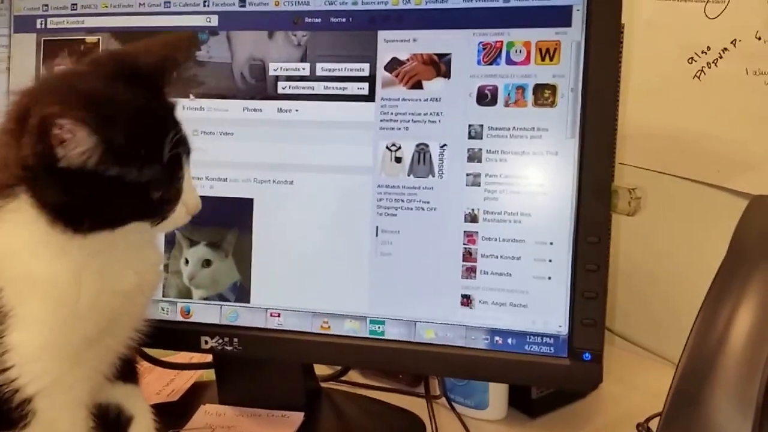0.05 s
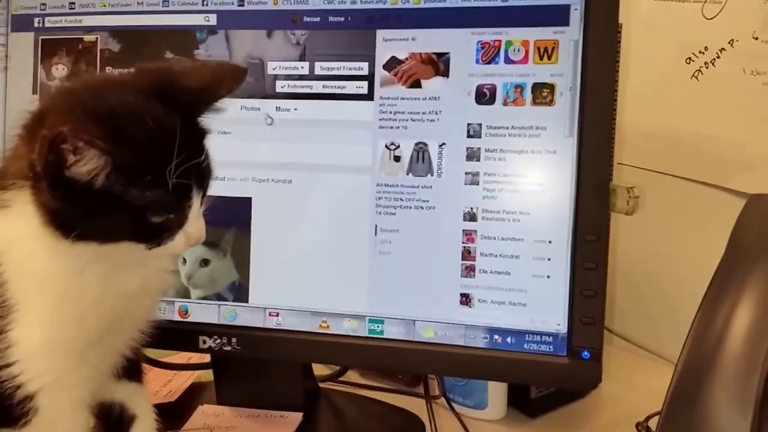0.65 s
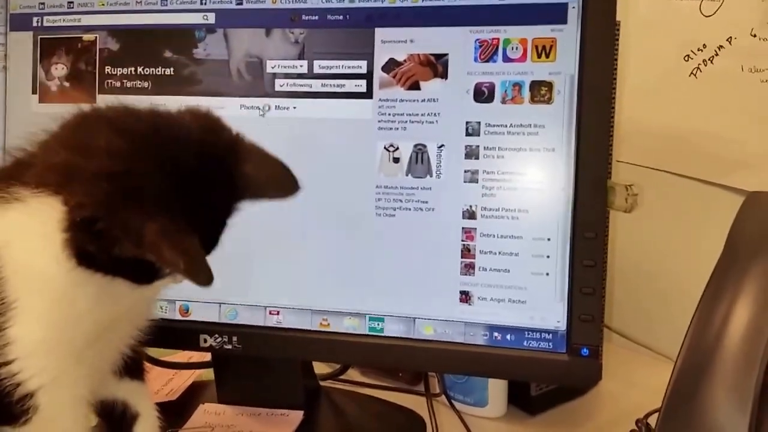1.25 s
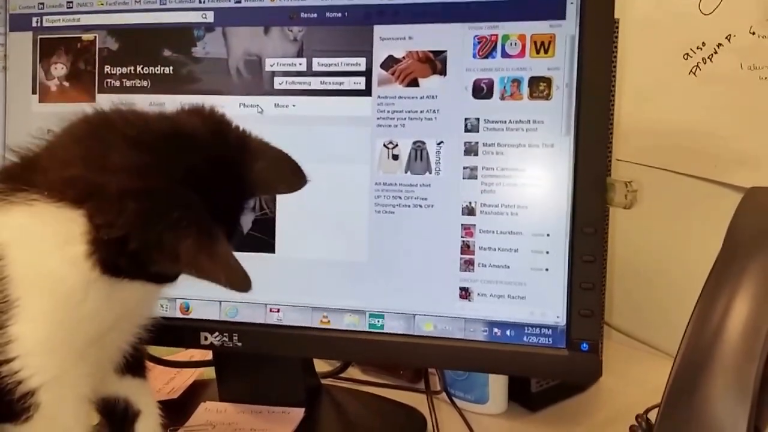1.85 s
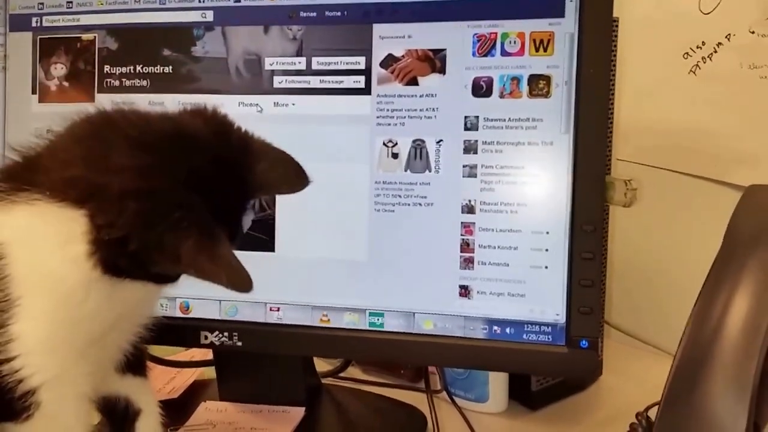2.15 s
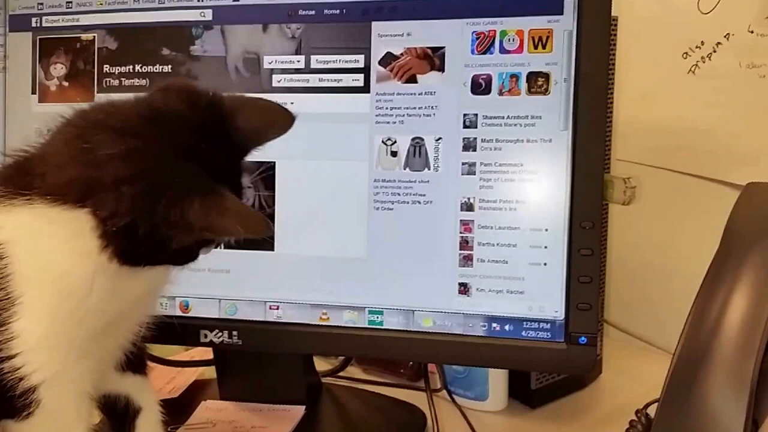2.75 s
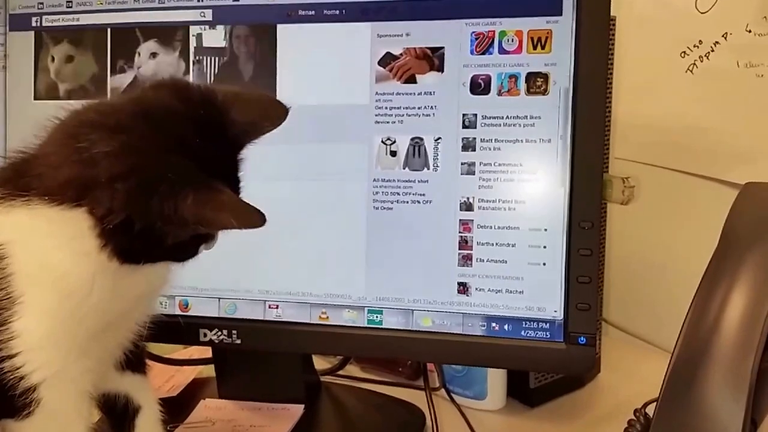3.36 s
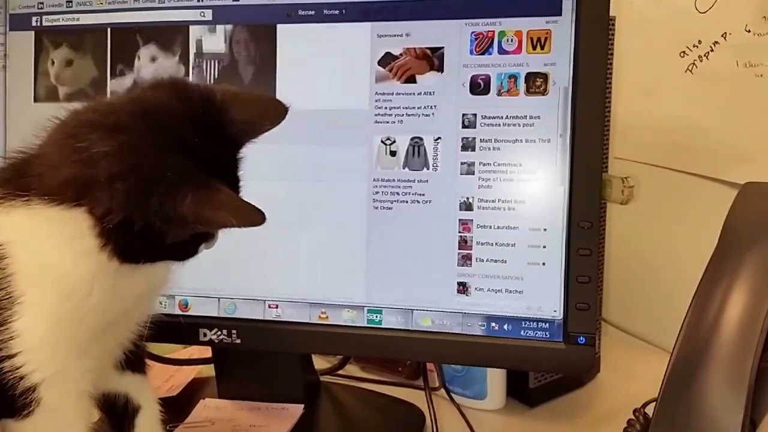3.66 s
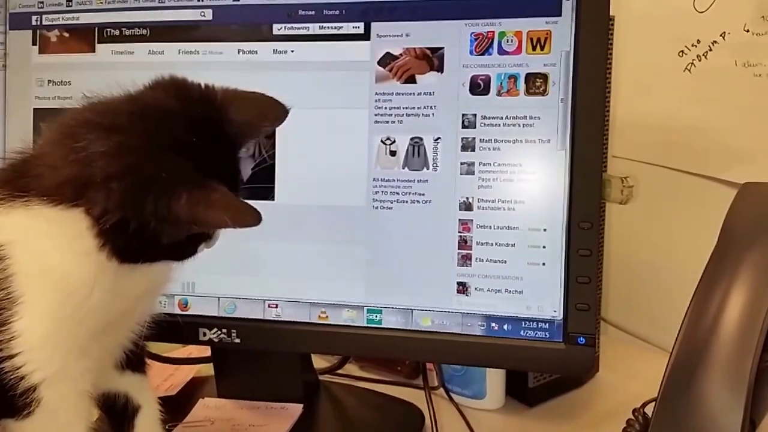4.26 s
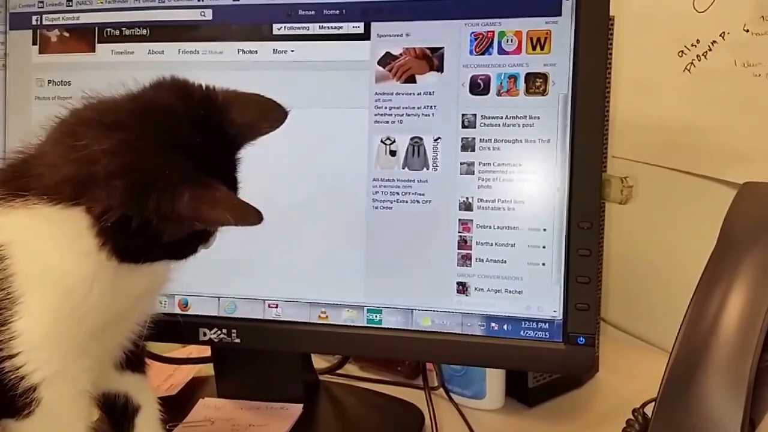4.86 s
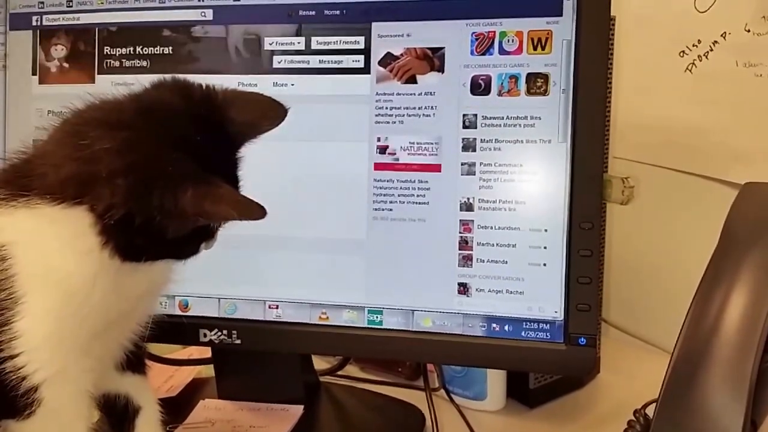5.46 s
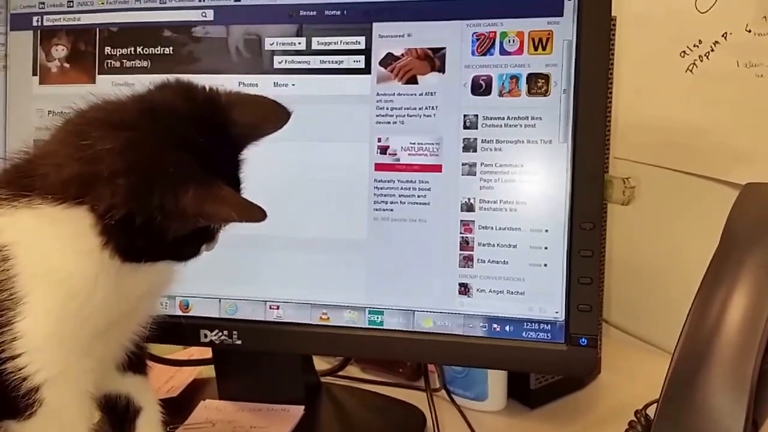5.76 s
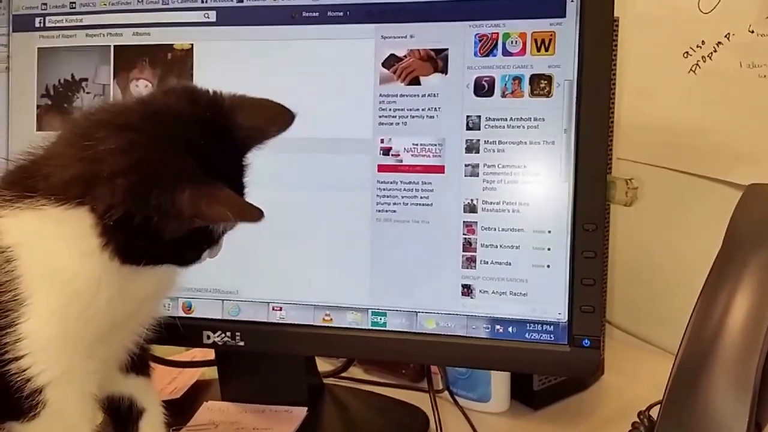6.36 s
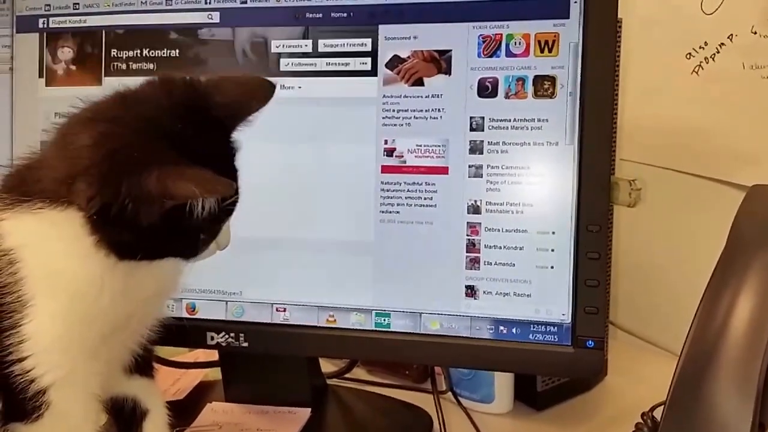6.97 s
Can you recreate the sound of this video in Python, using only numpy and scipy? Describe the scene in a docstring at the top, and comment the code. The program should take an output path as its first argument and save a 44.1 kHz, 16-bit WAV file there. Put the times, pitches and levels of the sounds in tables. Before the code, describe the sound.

A soft ventilation rumble with a little rush and thin hiss fills a small office throughout, along with a low electrical hum and a motor drone that slowly swells and fades. At about 1 second a computer mouse button snaps down and up, crisp and close to the microphone. From about 2.6 to 4 seconds the plastic mouse knocks and scuffs lightly on the desk while its wheel gives a few irregular ticks, each very brief. Near 4.8 seconds the button clicks down and up again, a little softer. From about 5.5 seconds there is a barely audible, very high sizzle. A last cluster of small knocks and ticks comes between 6.3 and 7 seconds. The mouse sounds carry only a short, slight room echo, and the hum and air continue between them.

```python
"""A small office: ventilation rumbles, rushes and hisses over a mains hum, and a motor's low drone
swells and fades. After a second a computer mouse button snaps down and up. Then the plastic shell
knocks and scuffs on the desk and the wheel ticks, each contact a brief chatter that rings the plastic.
Near five seconds the button clicks again. A faint, very high sizzle follows, and a last cluster of
knocks and ticks ends the scene."""
import sys
import numpy as np
from scipy import signal
from scipy.fft import rfft, irfft
from scipy.io import wavfile

SR = 44100
rng = np.random.default_rng(int(sys.argv[2]) if len(sys.argv) > 2 else 0)


def wav_record(signal):
    """Record a signal, one row per channel, as 16-bit PCM in the file named by sys.argv[1]."""
    frames = np.transpose(np.atleast_2d(signal))
    bounded = np.clip(frames, -1, 1)
    # unit amplitude maps onto the largest positive 16-bit level
    quanta = np.round(bounded * 32767).astype(np.int16)
    wavfile.write(sys.argv[1], SR, quanta)


N = 313992

# the shell hitting the desk: (time [s], strength [dB], treble [dB])
DESK_KNOCKS = [(1.1285, -46.5, -7.5), (2.6470, -49.5, -14), (2.9880, -57, 6), (3.6990, -50.5, -7),
               (3.729, -47, 7.5), (3.738, -43.5, 4), (4.0400, -49.5, -7), (4.8798, -45, -30),
               (6.3100, -42, -9), (6.3478, -59, 7), (6.6715, -51, 0), (6.6785, -47, -6.5),
               (6.9618, -54.5, -3.5)]
KNOCK_CHATTER_S = 0.0022


def from_db(db):
    """Decibels to gain."""
    return 10 ** (np.asarray(db) / 20)


def rms_one(x):
    """Scale to unit rms."""
    return x / np.sqrt(np.mean(x ** 2) + 1e-20)


def in_time(rows):
    """An automation curve, read at every sample."""
    times, values = np.transpose(rows)
    return np.interp(np.arange(N) / SR, times, values)


def at_hz(points, hz):
    """Each column of a spectrum, read on a log-frequency axis."""
    freqs, *columns = np.transpose(points)
    return [np.interp(np.log(hz), np.log(freqs), column) for column in columns]


def butter(x, hz, kind):
    """Causal Butterworth filter."""
    return signal.sosfilt(signal.butter(2, hz, kind, fs=SR, output="sos"), x + 1e-18)


def drift(rate_hz):
    """A slow random wobble of unit rms."""
    knots = rng.standard_normal(int(rate_hz * N / SR) + 2)
    return rms_one(np.interp(np.arange(N) * rate_hz / SR, np.arange(len(knots)), knots))


def resonate(x, modes):
    """A bank of parallel resonators of alternating polarity."""
    ringing = 0
    for k, (hz, width_hz, db) in enumerate(modes):
        radius = np.exp(-np.pi * width_hz / SR)
        poles = [1, -2 * radius * np.cos(2 * np.pi * hz / SR), radius ** 2]
        gain = (-1) ** k * from_db(db) * (1 - radius ** 2) / 2
        ringing = ringing + gain * signal.lfilter([1, 0, -1], poles, x + 1e-18)
    return ringing


def from_the_right(x, lag_s=0.00016):
    """Sound from the right reaches the left side a little later."""
    t = np.arange(N) / SR
    return np.array([np.interp(t - lag_s, t, x[0]), x[1]])


def air_noise(spectrum):
    """Coloured stereo noise of unit rms, nearly mono in the bass and wide in the treble."""
    # likeness of the two sides: (frequency [Hz], correlation [-1 to 1])
    likeness = [(30, 0.97), (125, 0.95), (250, 0.79), (500, 0.59), (1000, 0.25), (2000, 0.61),
                (5000, -0.56), (14000, 0.079)]
    hz = np.maximum(np.arange(N // 2 + 1) * SR / N, 1)
    mid, side = rfft(rng.standard_normal((2, N)))
    alike = at_hz(likeness, hz)[0]
    pair = np.sqrt(1 + alike) * mid + np.sqrt(1 - alike) * side * [[1], [-1]]
    colour = from_db(at_hz(spectrum, hz)[0])
    return rms_one(irfft(pair * colour, N))


def ventilation(rush_follows=0.9, hiss_follows=1.17):
    """Moving air: a steady rumble, plus a rush, faint fan tones and thin hiss that swell with the flow."""
    # strength of the airflow: (time [s], relative level [dB])
    airflow = [(0.0, -92.5), (0.61, -87), (1.23, -80.5), (2.06, -86.5), (2.32, -86), (2.79, -82.5),
               (3.05, -82), (3.39, -85), (3.98, -85.5), (4.14, -88.5), (4.42, -89.5), (4.88, -83.5),
               (5.15, -89.5), (6.19, -87.5), (6.9, -89), (7.12, -90)]
    # colours of the three air layers: (frequency [Hz], relative density [dB])
    rumble_colour = [(15, -15), (30, -18), (38, -3.5), (47, 3.5), (58, -4.5), (75, -7.5), (95, -10.5),
                     (112, -6.5), (128, -11), (142, -6), (165, -16), (230, -17), (400, -27), (1000, -76)]
    rush_colour = [(100, -11), (220, -4), (300, -9), (400, -8), (590, -13.5), (800, -12.5), (1030, -18),
                   (1600, -22.5), (2250, -24.5), (3200, -36.5), (4250, -33), (5200, -40.5), (7300, -56.5),
                   (16000, -87)]
    hiss_colour = [(3000, -58.5), (7500, -29.5), (8700, -3), (11000, -1), (11400, 3), (12500, 1.5),
                   (13600, 3), (15000, -2.5)]
    # fan tones in the rush: (frequency [Hz], width [Hz], gain [dB])
    fan_modes = [(205.3, 7.9, -3.5), (236.8, 8, -3), (375.4, 5.2, -3.5), (428.6, 8.6, -1.5),
                 (664, 4.7, -15.5), (756.4, 40, -13), (851, 30, -13), (1558, 110, -22.5)]
    flow_db = in_time(airflow)
    swell_db = flow_db - flow_db.mean()
    rumble = from_db(-49.5) * air_noise(rumble_colour) * from_db([[.5], [-.5]])
    fan = from_db(-6.5) * rms_one(resonate(rng.standard_normal(N), fan_modes))
    rush = from_db(-61.5 + rush_follows * swell_db) * (air_noise(rush_colour) + fan)
    hiss = from_db(-80.5 + hiss_follows * swell_db) * air_noise(hiss_colour) * from_db([[-1.7], [1.7]])
    return from_the_right(rumble + rush) + hiss


def hum_tone(phase, db):
    """A sine at a given rms level, panned slightly left."""
    return np.sqrt(2) * from_db(db) * np.sin(phase) * from_db([[.55], [-.55]])


def mains_hum(hz=120, waver_db=0.5):
    """A gently wavering hum at twice the mains rate."""
    # the hum's envelope: (time [s], level [dB])
    envelope = [(0.05, -51), (0.16, -56), (1.35, -49.5), (5.68, -59), (7.0, -57.5)]
    phase = 2 * np.pi * hz * np.arange(N) / SR
    return hum_tone(phase, in_time(envelope) + waver_db * drift(6.2))


def motor_drone(trim_db=-0.4, waver_db=1.3):
    """A motor's low tone swells and fades; its pitch sags slowly, with one brief lift."""
    # the drone's swells: (time [s], relative level [dB])
    envelope = [(0.0, -63), (0.95, -41), (1.86, -48), (1.98, -65), (2.08, -51.5), (2.7, -41), (3.61, -47),
                (3.77, -52.5), (3.86, -52.5), (4.2, -61), (4.54, -44), (4.8, -50), (4.9, -73),
                (5.19, -57.5), (5.37, -66), (5.55, -52.5), (7.12, -65.5)]
    # the motor's pitch: (time [s], frequency [Hz])
    pitch = [(0.7, 73.95), (2.4, 73.52), (4.7, 71.94), (5.3, 70.9), (5.85, 74), (6.3, 69.1), (7.12, 69)]
    phase = 2 * np.pi * np.cumsum(in_time(pitch)) / SR
    return hum_tone(phase, in_time(envelope) + trim_db + waver_db * drift(4.6))


def chatter(length_s, settle_s, treble_db, treble_hz):
    """One contact: plastic parts rattle briefly and settle; a treble shelf sets how hard it sounds."""
    n = SR // 40
    t = np.arange(n) / SR
    envelope = np.exp(-np.maximum(t - length_s, 0) / settle_s)
    spectrum = rfft(rng.standard_normal(n) * envelope)
    whitened = irfft(spectrum / np.abs(spectrum), n)
    burst = rms_one(whitened * envelope)
    hz = np.arange(n + 1) * SR / (2 * n)
    high = (hz / treble_hz) ** 6
    shelf = from_db(treble_db * high / (1 + high))
    return irfft(rfft(burst, 2 * n) * shelf)[:n]


def strike(contacts, modes, settle_s, treble_hz, scatter_db):
    """Contacts ring a plastic part; the desk and monitor scatter each one differently to each side."""
    force = np.zeros((2, N))
    for s, db, treble_db, length_s in contacts:
        direct = chatter(length_s, settle_s, treble_db, treble_hz)
        scattered = np.array([chatter(length_s, 2 * settle_s, treble_db, treble_hz) for _ in range(2)])
        at = round(s * SR)
        force[:, at:at + len(direct)] += from_db(db) * (direct + from_db(scatter_db) * scattered)
    return resonate(force, modes)


def button_clicks(settle_s=.0016, press_chatter_s=.0023, press_treble_db=-0.8):
    """The button snaps down, setting the switch's spring ringing, and snaps back up."""
    # button going down: (time [s], strength [dB])
    presses = [(1.0056, -37.5), (4.7616, -40.5)]
    # button coming up: (time [s], strength [dB], chatter [s])
    releases = [(1.1319, -34.5, .0038), (4.897, -38.5, 0.0037)]
    # resonances of each stroke: (frequency [Hz], width [Hz], gain [dB])
    press_modes = [(705, 71, 1), (980, 580, -16.5), (2330, 590, -16.5), (3180, 440, -16.5), (4010, 150, -6),
                   (7430, 240, -5), (8195, 550, -14), (7600, 6.7, 5), (10400, 900, -10.5),
                   (12300, 700, -19), (13900, 560, -17)]
    release_modes = [(637, 98, 3.5), (760, 170, -6), (1550, 1100, -32), (2620, 170, -19), (3110, 270, -11),
                     (3840, 560, -12.5), (7500, 400, -1), (7880, 1340, -9.5), (10180, 310, -4.5),
                     (11670, 690, -3.5), (12110, 670, -4.5), (14350, 980, -21.5)]
    downs = [(s, db, press_treble_db, press_chatter_s) for s, db in presses]
    ups = [(s, db, 0, length_s) for s, db, length_s in releases]
    down_clicks = strike(downs, press_modes, settle_s, treble_hz=6000, scatter_db=-9.5)
    up_clicks = strike(ups, release_modes, settle_s, treble_hz=6100, scatter_db=-0.5)
    return down_clicks + up_clicks


def shell_knocks():
    """The plastic shell hits the desk and rings briefly in the mids."""
    # the shell's resonances: (frequency [Hz], width [Hz], gain [dB])
    modes = [(716, 114, 5), (930, 230, 1), (1485, 126, 3), (1795, 330, -4.5), (2260, 930, -11.5),
             (3420, 67, -19), (4090, 250, -22)]
    knocks = [(s, db, treble_db, KNOCK_CHATTER_S) for s, db, treble_db in DESK_KNOCKS]
    return strike(knocks, modes, settle_s=0.0005, treble_hz=1160, scatter_db=-5)


def wheel_ticks(rattle_growth=1.36, rattle_treble_db=-6.5):
    """Ticks and light scuffs ring the wheel; knocks on the shell rattle it too, hard ones the most."""
    # wheel ticks and light scuffs: (time [s], strength [dB], treble [dB], chatter [s])
    ticks = [(2.9178, -47, 7.5, 0.0011), (2.9835, -59.5, 0, .005), (3.0440, -47.5, -4, 0.0041),
             (3.1110, -55.5, -10, .002), (3.2198, -56.5, 2.5, .002), (3.7725, -59, -3, 0.0027),
             (3.7765, -46, 0.5, 0.0042), (6.3065, -49, -23, 0.0021), (6.3480, -52, -17, 0.0015),
             (6.6265, -55.5, -23, 0.0026), (6.6672, -48.5, -7, .0072), (6.7475, -59.5, -4, 0.0066)]
    # the wheel's resonances: (frequency [Hz], width [Hz], gain [dB])
    modes = [(746, 250, -1), (1810, 540, -3), (2320, 810, -7.5), (3630, 530, -5), (4320, 490, -8.5),
             (6420, 540, -19.5), (8600, 440, -5), (10100, 1150, -7.5), (11950, 3300, -15)]
    times, strength_db, treble_db = np.transpose(DESK_KNOCKS)
    hardness_db = strength_db + treble_db / 2
    rattle_db = -47 + rattle_growth * (hardness_db - hardness_db.max())
    rattles = [(s, db, rattle_treble_db, KNOCK_CHATTER_S) for s, db in zip(times, rattle_db)]
    return strike(ticks + rattles, modes, settle_s=0.0024, treble_hz=6460, scatter_db=0)


def shade(x):
    """Constant-power panning that shares the direct sound differently at each frequency."""
    # the mouse's stereo balance: (frequency [Hz], left over right [dB])
    balance = [(700, 1), (1700, 0), (3800, 7.5), (6000, 14), (8000, 4.5), (12000, -0.5)]
    hz = np.maximum(np.arange(N // 2 + 1) * SR / N, 1)
    ratio = from_db(at_hz(balance, hz)[0])
    right = np.sqrt(2 / (1 + ratio ** 2))
    return irfft(rfft(x) * [ratio * right, right], N)


def office_reverb(x, predelay_s=.004, echo_s=.0098, echo_db=-21):
    """One near reflection and a short diffuse tail that dies band by band."""
    # the room's tail: (frequency [Hz], time to fall 60 dB [s], level [dB])
    decays = [(400, .3, -10), (1500, .28, -9.5), (4000, .26, -11.5), (7500, .25, -14.5), (14000, .27, -11)]
    t = np.arange(SR // 2) / SR
    edges_hz = np.geomspace(300, 16000, 11)
    response = np.zeros((2, len(t)))
    for band in zip(edges_hz, edges_hz[1:]):
        t60, db = at_hz(decays, np.sqrt(np.prod(band)))
        tail = rng.standard_normal((2, len(t))) * from_db(-60 * t / t60) * (t > predelay_s)
        response += from_db(db) * butter(rms_one(tail) / np.sqrt(len(t)), band, "band")
    response[:, round(echo_s * SR)] += from_db(echo_db)
    return signal.fftconvolve(x, response, axes=1)[:, :N]


def sizzle(half_width_hz=400):
    """A faint, very high band of noise that steps down in pitch."""
    # the band's path: (time [s], centre [Hz], level [dB])
    path = [(5.43, 11600, -100), (5.46, 11800, -84), (5.60, 11760, -84.5), (5.66, 10600, -92),
            (6.2, 10400, -92), (6.78, 10560, -86.5), (6.9, 10700, -110)]
    times, centre_hz, level_db = np.transpose(path)
    t = np.arange(N) / SR
    carrier = np.sin(2 * np.pi * np.cumsum(np.interp(t, times, centre_hz)) / SR)
    flutter = butter(rng.standard_normal((2, N)), half_width_hz, "low")
    envelope = from_db(np.interp(t, times, level_db)) * (t > times[0])
    return envelope * rms_one(flutter * carrier)


def scene():
    """The mouse, close up and with its reverb, over the room tone."""
    mouse = from_db(0.5) * button_clicks() + from_db(-3) * wheel_ticks() + from_db(1.2) * shell_knocks()
    mouse_in_room = shade(from_the_right(mouse)) + office_reverb(mouse)
    return mouse_in_room + ventilation() + motor_drone() + mains_hum() + sizzle()


def record(dry, cutoff_hz=14650):
    """A steep low-pass takes off the very top."""
    return signal.sosfilt(signal.ellip(10, .2, 70, cutoff_hz, fs=SR, output="sos"), dry)


dry = scene()
out = record(dry)
wav_record(out)
```